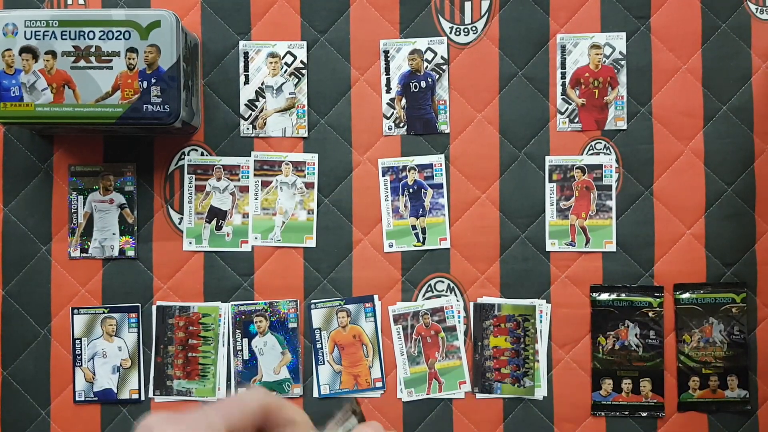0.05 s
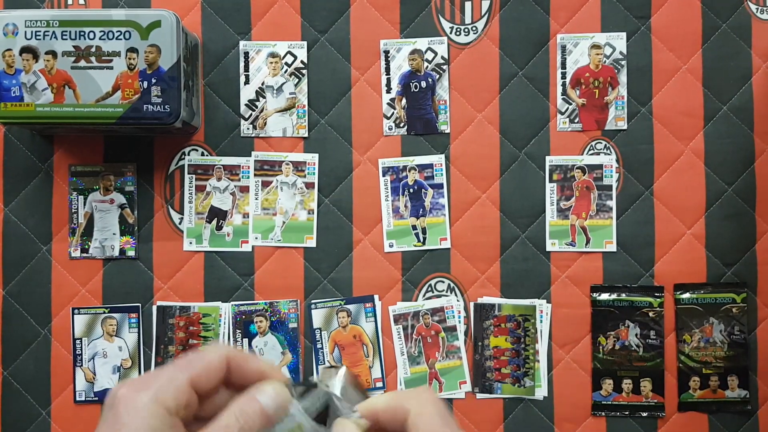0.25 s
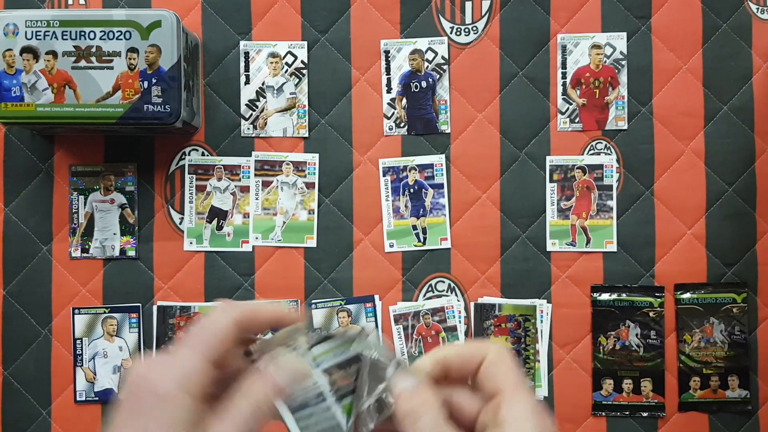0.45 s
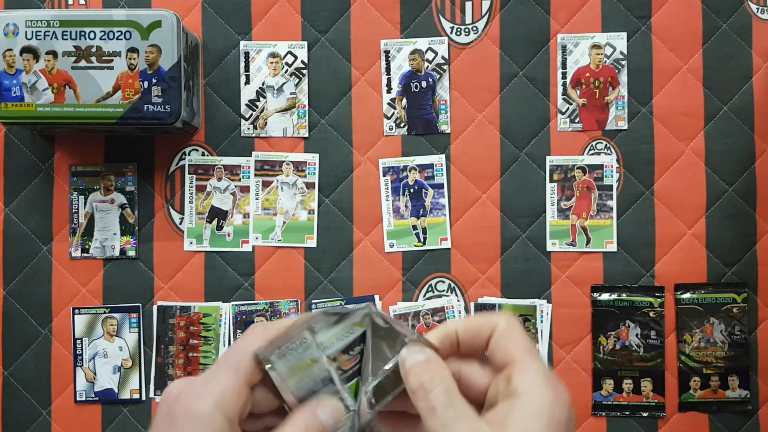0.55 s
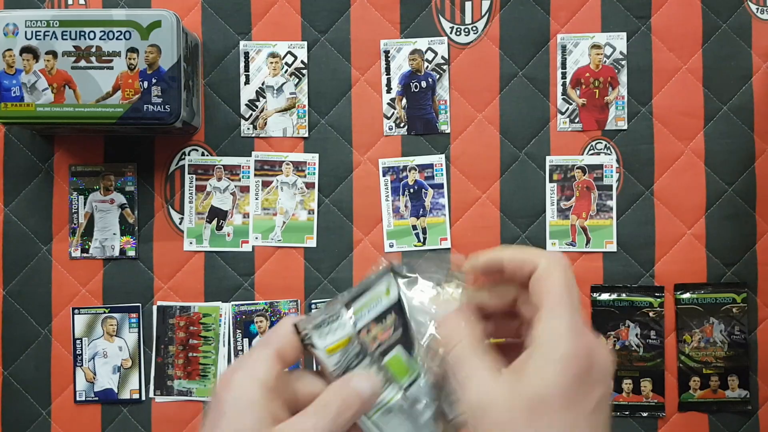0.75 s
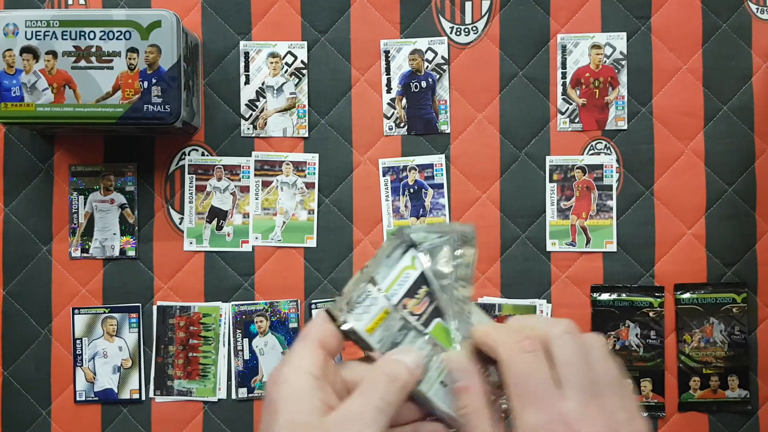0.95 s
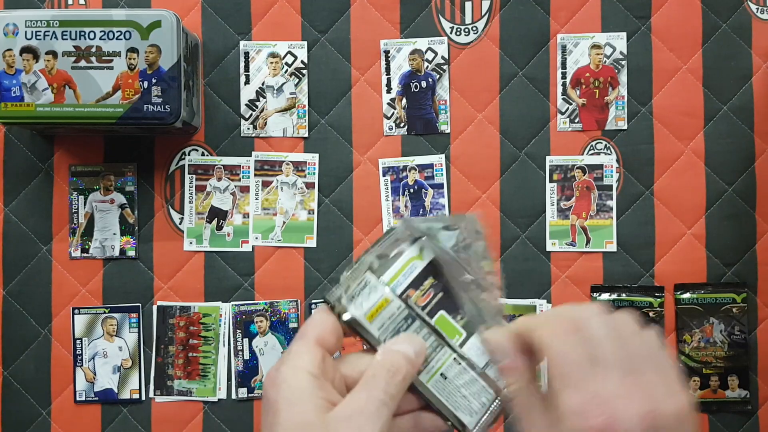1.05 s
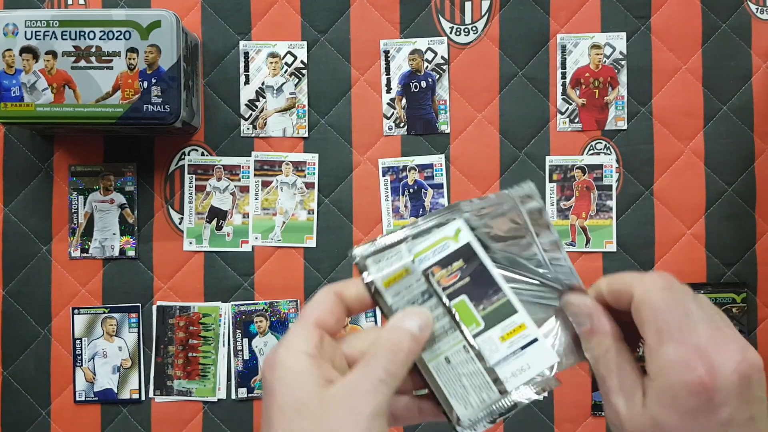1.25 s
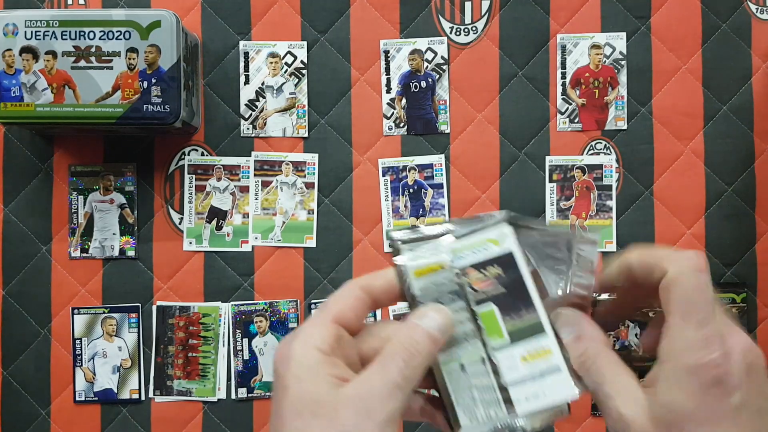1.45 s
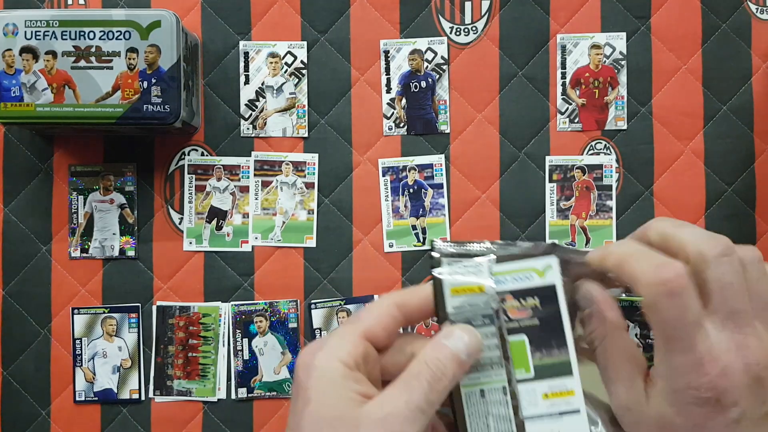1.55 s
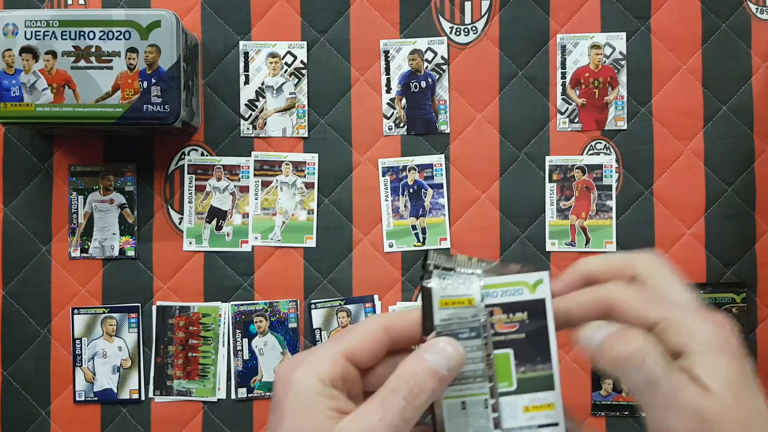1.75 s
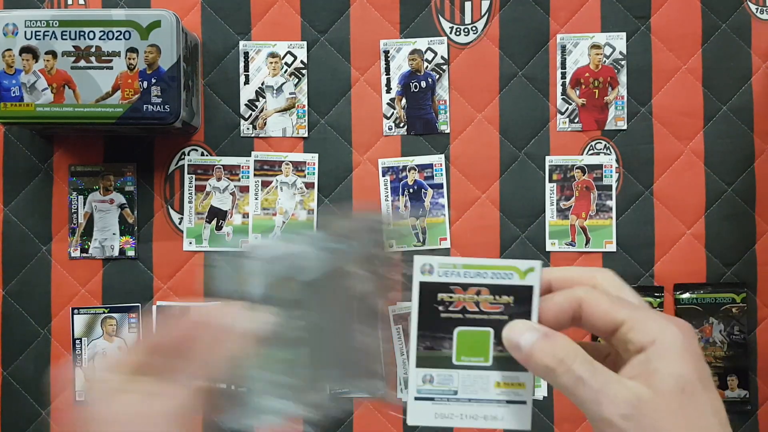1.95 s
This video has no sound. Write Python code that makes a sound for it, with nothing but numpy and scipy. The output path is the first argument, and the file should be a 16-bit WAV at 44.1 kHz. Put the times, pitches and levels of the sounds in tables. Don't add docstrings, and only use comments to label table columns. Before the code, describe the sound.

Close stereo phone pickup of a foil card pouch being torn open: a sudden crackle, scattered ticks and rustles, a stronger burst of papery pops midway, then sparse folding crinkles in a fairly dry, quiet room.

```python
import sys
import numpy as np
from scipy import signal
from scipy.fft import rfft, irfft, next_fast_len
from scipy.io import wavfile
from scipy.ndimage import uniform_filter1d

SR = 44100
rng = np.random.default_rng(int(sys.argv[2]) if len(sys.argv) > 2 else 0)


def gain_from_db(level_db):
    decades = np.asarray(level_db, float) / 20
    return 10 ** decades


def generate_wav(signal):
    frames = np.transpose(np.atleast_2d(signal))
    scaled = np.clip(frames, -1, 1) * 32767
    pcm = np.round(scaled).astype(np.int16)
    wavfile.write(sys.argv[1], SR, pcm)


N = 88200
PANEL_CYCLES, POUCH_CYCLES = 1.65, 1.0


def evened(x):
    return x / np.sqrt(np.mean(x ** 2) + 1e-20)


def read(points, hz):
    f, value = np.transpose(points)
    return np.interp(np.log(hz + 1), np.log(f + 1), value)


def colour(x, points, lag_s=0):
    size = next_fast_len(N + 4096)
    hz = np.fft.rfftfreq(size, 1 / SR)
    delay = np.exp(-2j * np.pi * hz * lag_s)
    return irfft(rfft(x, size) * gain_from_db(read(points, hz)) * delay, size)[..., :N]


def add(mix, s, sound):
    part = mix[..., round(s * SR):][..., :sound.shape[-1]]
    part += sound[..., :part.shape[-1]]


def partly_alike(a, b, same):
    return np.array([a, same * a + np.sqrt(1 - same ** 2) * b])


def pop(hz, cycles):
    u = np.arange(1024) / SR * hz
    shape = (1 - np.exp(-u / 0.18)) * np.exp(-2 * u / cycles) * np.sin(2 * np.pi * u)
    return shape / abs(shape).max()


def apart(shape, luck):
    return np.array([shape, np.roll(shape, int(7 * luck))])


def tick(noise, hz, luck):
    rise_s, spit_s, shiver_s, shiver_db = 0.0003, 0.0004, 0.0028, -20
    longest = 2.7
    t = np.arange(noise.shape[1]) / SR / (1 + (longest - 1) * luck ** 2)
    rise = (1 - np.exp(-t / rise_s)) ** 2
    fall = np.exp(-t / spit_s) + gain_from_db(shiver_db) * np.exp(-t / shiver_s)
    spit = partly_alike(noise[0], noise[1], 0.1) * rise * fall
    spit = signal.sosfilt(signal.butter(2, hz, "high", fs=SR, output="sos"), spit)
    return evened(spit) / 12


# start in seconds, peak level in dB, panel pitch in Hz, tick level in dB.
GRIP_BUCKLES = [(0.0568, -48, 3980, -43), (0.098, -49, 3390, -53), (0.1268, -43.5, 4440, -54.5),
                (0.166, -63, 3100, -44.5), (0.178, -27.5, 2880, -39), (0.1984, -24, 4200, -47),
                (0.2112, -22, 1210, -27), (0.2188, -27, 5170, -25), (0.2267, -15, 4830, -44),
                (0.267, -27, 3400, -38), (0.3772, -30.5, 2580, -40), (0.4025, -35, 1600, -39.5),
                (0.4456, -26.5, 2430, -36.5), (0.4666, -32.5, 1640, -39), (0.4802, -28.5, 2580, -58),
                (0.5239, -26.5, 1510, -47), (0.5687, -26.5, 5650, -54), (0.609, -28.5, 1050, -47.5),
                (0.6354, -31, 1620, -44.5), (0.6844, -32, 1570, -35), (0.7162, -50, 1990, -29.5),
                (0.7428, -60, 1540, -58), (0.763, -24, 5000, -29), (0.7829, -24.5, 1680, -30),
                (0.7982, -46, 2160, -32.5), (0.8704, -30, 1150, -37.5), (0.904, -29, 1920, -39.5),
                (0.9567, -44, 1740, -52), (0.9782, -47, 1530, -51)]
# start in seconds, peak level in dB, panel pitch in Hz, tick level in dB.
RIP_BUCKLES = [(1.0117, -31.5, 2300, -38.5), (1.035, -35, 5800, -39.5), (1.043, -29, 1510, -39),
               (1.1113, -39.5, 1550, -41), (1.1358, -31.5, 3950, -30.5), (1.1665, -22.5, 1580, -39),
               (1.1887, -24.5, 2100, -31), (1.2423, -17.5, 2100, -41), (1.2496, -24, 1610, -31),
               (1.2569, -19.5, 1580, -28.5), (1.262, -16, 1430, -32.5), (1.2747, -14, 1640, -51),
               (1.2845, -35, 4460, -24), (1.289, -13, 1670, -53), (1.3003, -9.5, 1790, -48),
               (1.3007, -17, 2140, -27), (1.3341, -15, 2620, -32), (1.3379, -17, 1220, -47),
               (1.3936, -30, 2080, -47), (1.4122, -24.5, 1540, -34), (1.4356, -30.5, 1960, -41),
               (1.53, -20.5, 2480, -31.5), (1.582, -31, 1840, -39.5), (1.5986, -24, 1860, -39.5),
               (1.7115, -29, 1880, -46.5), (1.7403, -33, 2840, -46), (1.7582, -33, 1990, -43),
               (1.8986, -48, 1690, -79), (1.9769, -30.5, 2730, -38.5), (1.9924, -32.5, 1560, -54)]
# start in seconds, peak level in dB, panel pitch in Hz, tick level in dB.
SMALL_CREASES = [(.0499, -39, 4260, -46.5), (.054, -37.5, 2840, -54), (0.064, -46, 3880, -53),
                 (0.1874, -47, 3830, -48), (0.1933, -36, 6220, -47), (.2332, -33, 4670, -41),
                 (.2985, -35, 6460, -53), (.3286, -34, 5900, -49), (0.392, -37, 6100, -46),
                 (0.484, -41, 6200, -41), (0.497, -34, 7000, -34), (0.502, -34, 6960, -36),
                 (.518, -34.5, 1580, -36), (0.5298, -31, 1560, -41), (.5524, -33.5, 930, -45),
                 (.565, -29.5, 2120, -46), (0.6495, -48, 890, -45), (.757, -33, 6930, -30.5),
                 (.7872, -37, 4670, -28), (0.794, -28, 6050, -36), (0.8114, -30, 910, -37),
                 (.8255, -39, 6720, -43), (.8433, -32.5, 930, -43), (.866, -34, 1840, -45),
                 (0.884, -23, 6760, -39), (0.896, -29, 880, -47), (1.0064, -34.5, 1010, -48),
                 (1.0296, -34, 2300, -47), (1.068, -46, 1180, -40.5), (1.115, -30.5, 1630, -48),
                 (1.1228, -41, 5600, -38.5), (1.129, -28, 5510, -35), (1.174, -27.5, 1120, -36.5),
                 (1.202, -34.5, 1080, -35.5), (1.213, -36, 2290, -40), (1.2929, -19.5, 1480, -34),
                 (1.328, -24, 1580, -39), (1.403, -39, 1510, -49), (1.4252, -27, 2090, -46),
                 (1.4437, -38, 5130, -41), (1.5039, -37.5, 2580, -53), (1.5167, -40, 1820, -54),
                 (1.5394, -25, 2710, -50), (1.5517, -32.5, 2150, -38), (1.6072, -33, 2190, -50),
                 (1.622, -41, 1830, -52), (1.661, -35, 1730, -49), (1.7895, -32.5, 2770, -50.5),
                 (1.807, -38, 2850, -57), (1.906, -41, 1730, -54)]


def snaps():
    panel_trim_db, tick_trim_db = -2, 13.5
    rows = GRIP_BUCKLES + RIP_BUCKLES + SMALL_CREASES
    out = np.zeros((2, N))
    luck = rng.random((len(rows), 4))
    noise = rng.standard_normal((len(rows), 2, 1024))
    for (s, db, hz, tick_db), (side, late, tune, place), hiss in zip(rows, luck, noise):
        add(out, s + 0.0005, gain_from_db(tick_trim_db + tick_db) * tick(hiss, 6200, late))
        level = gain_from_db(db + panel_trim_db)
        panel = apart(pop(hz, PANEL_CYCLES), place)
        add(out, s + 0.000981, np.sign(side - 0.5) * level * panel)
        neighbour = apart(pop(hz * (0.48 + 0.57 * tune), 0.5 * PANEL_CYCLES), place)
        add(out, s + 0.001405 + 0.002004 * late, gain_from_db(-2) * level * neighbour)
    return out


def seal_crack():
    out, hz = np.zeros((2, N)), 10500
    near_db, far_db = -8, -24
    add(out, 0.21185, gain_from_db([[near_db], [far_db]]) * (pop(hz, 5.0) + 0.5 * pop(1.19 * hz, 4.8)))
    return out


# start in seconds, peak level in dB, pitch in Hz, sub-bass level in dB.
AIR_PUSHES = [(0.2089, -40.5, 427, -56.5), (0.372, -48.5, 283, -70), (0.512, -45, 530, -71),
              (0.604, -36.5, 480, -83), (0.684, -37, 353, -60.5), (0.744, -40, 394, -67),
              (0.872, -41, 348, -66), (1.017, -38.5, 306, -94), (1.078, -39, 284, -56.5),
              (1.174, -37, 450, -58), (1.257, -32, 300, -56), (1.333, -25, 425, -53.5),
              (1.411, -28, 375, -69), (1.436, -33, 400, -75), (1.451, -40, 220, -70),
              (1.468, -41.5, 158, -62), (1.528, -30, 404, -56), (1.595, -37, 327, -55),
              (1.736, -44.5, 276, -60), (1.923, -49.5, 325, -67)]


def pushes():
    wobble_trim_db, sub_trim_db, sub_hz = 6, 26.5, 102
    out = np.zeros(N)
    for s, db, hz, sub_db in AIR_PUSHES:
        wobble = gain_from_db(db + wobble_trim_db) * pop(hz, 1.26 * POUCH_CYCLES)
        swing = gain_from_db(sub_db + sub_trim_db) * pop(sub_hz, 0.83)
        add(out, s + 0.003, wobble + swing)
    return out


def tension_db():
    hush_db, hush_s, rattle_db, rattle_s = -4, 0.012, 2, 0.01
    t, hush, rattle = np.arange(N) / SR, np.zeros(N), np.zeros(N)
    for row in GRIP_BUCKLES + RIP_BUCKLES:
        since = t - row[0]
        hush = np.maximum(hush, (since < 0) * np.exp(-abs(since) / hush_s))
        rattle = np.maximum(rattle, (since > 0) * np.exp(-abs(since) / rattle_s))
    return hush_db * hush + rattle_db * rattle


def crease_sizes():
    creases_per_s, spread_db, clump_db, clump_s = 2400, 4.2, 3.5, 0.0048
    clump = evened(uniform_filter1d(rng.standard_normal(N), round(clump_s * SR)))
    luck = np.minimum(rng.exponential(1, N), 2.0)
    size = gain_from_db(spread_db * luck + clump_db * clump + tension_db())
    return size * (rng.random(N) < creases_per_s / SR) * rng.choice([-1., 1.], N)


# time in seconds, effort in dB, pouch squeeze in dB, crispness in dB.
HAND_EFFORT = [(0.151, -84, 16, -10), (0.219, -33.5, -25, 1.5), (0.348, -55, -14.5, 0.5),
               (.44, -53, -5.5, 5.5), (0.502, -41.5, -7.5, 4.5), (0.662, -49, 2.5, -5),
               (0.782, -36.5, -5, -12), (0.989, -80, 12, 0), (1.019, -48, -1.5, -16),
               (1.235, -43.5, -11.5, -1), (1.253, -35.5, 4, -10), (1.336, -42.5, 6.5, 3),
               (1.388, -52, 7, -5), (1.417, -35, 2.5, -25), (1.51, -58, 5.5, -7), (1.537, -37, -3, -12),
               (1.888, -77.5, 4, -11), (2.0, -48.5, -1, -11)]


def crinkle(count=24):
    s, effort_db, pouch_db, crisp_db = np.transpose(HAND_EFFORT)
    size = crease_sizes()
    kind = rng.integers(0, count, N)
    noise, place = rng.standard_normal((count, 2, 1024)), rng.random(count)
    panel_hz = np.geomspace(757, 7900, count)
    pouch_hz = rng.permutation(np.geomspace(141, 586, count))
    layers = np.zeros((7, N))
    for k in range(count):
        pouch = evened(pop(pouch_hz[k], POUCH_CYCLES))
        panel = apart(evened(pop(panel_hz[k], PANEL_CYCLES)), place[k])
        large, small = panel * (2 * k < count), panel * (2 * k >= count)
        spit = tick(noise[k], 4900, place[k - 1])
        shapes = np.array([pouch, *large, *small, *spit])
        layers += signal.oaconvolve((size * (kind == k))[None], shapes, axes=1)[:, :N]
    parts = layers[0], layers[1:3], layers[3:5], layers[5:]
    small_db = effort_db - 4 + 0.2 * crisp_db
    gains = [effort_db + pouch_db, effort_db - 1, small_db, effort_db + crisp_db]
    t = np.arange(N) / SR
    return gain_from_db(-3.5) * sum(evened(x) * gain_from_db(np.interp(t, s, db)) for x, db in zip(parts, gains))


# frequency in Hz, time to fall by 60 dB in seconds.
ROOM_DECAY = [(150, 0.053), (1000, 0.19), (7800, 0.18), (9000, 0.08)]
# frequency in Hz, likeness from 0 to 1.
ROOM_LIKENESS = [(100, 0), (400, 0.84), (900, 0.85), (2000, 0)]


def room(x):
    taps = rng.standard_normal((2, SR // 2)) * (np.arange(SR // 2) > 120)
    hz, t, z = signal.stft(taps, SR, nperseg=256)
    same = np.clip(read(ROOM_LIKENESS, hz), 0, 1)[:, None]
    fall = gain_from_db(-60 * t / read(ROOM_DECAY, hz)[:, None])
    tail = signal.istft(partly_alike(z[0], z[1], same) * fall, SR, nperseg=256)[1]
    return signal.fftconvolve(x, tail / np.linalg.norm(tail[0]), axes=1)[:, :N]


# frequency in Hz, density in dB per Hz.
AIR_COLOUR = [(25, -15), (70, -6.5), (150, -4), (300, -7.5), (620, -11), (1650, -7.5), (4500, -14.5),
              (16000, -25.5)]
# frequency in Hz, likeness from 0 to 1.
AIR_LIKENESS = [(50, 0.71), (300, 0.54), (700, 0.17), (1500, 0.078)]


def air():
    hz = np.fft.rfftfreq(N, 1 / SR)
    a, b = rfft(rng.standard_normal((2, N)))
    same = np.clip(read(AIR_LIKENESS, hz), -1, 1)
    z = partly_alike(a, b, same) * gain_from_db(read(AIR_COLOUR, hz))
    return gain_from_db(-59) * evened(irfft(z, N))


# frequency in Hz, gain in dB.
FOIL_TONE = [(100, -17.5), (350, -3), (650, -1.5), (1500, 2), (3000, 8.5), (8000, 6), (8700, 2.5),
             (14000, 3)]
# frequency in Hz, gain in dB.
FAR_MIC_TONE = [(100, -1.5), (700, 0), (1500, -1.5), (4000, -1), (7600, -3), (8700, -11.5), (16000, -11)]


def scene():
    packet = colour(snaps() + seal_crack() + pushes() + crinkle(), FOIL_TONE)
    quilt = [(700, 4), (3000, -9.0), (9000, -48.0)]
    packet = packet - 0.34 * colour(packet, quilt, 0.001658)
    pair = np.array([packet[0], colour(packet[1], FAR_MIC_TONE, 0.00006)])
    return pair + gain_from_db(-9.5) * room(pair) + air()


def roll_off(x):
    return signal.sosfilt(signal.butter(12, 17000, fs=SR, output="sos"), x)


def record(dry):
    edge = signal.firwin(255, 15800, window=("kaiser", 9), fs=SR)
    x = signal.oaconvolve(dry, edge[None], "same")
    above = dry - x
    power = above ** 2
    sudden = uniform_filter1d(power, 90) > gain_from_db(2 * 8) * uniform_filter1d(power, 2000)
    gate = uniform_filter1d(1. * sudden, 120)
    glint = signal.sosfilt(signal.butter(12, 16900, fs=SR, output="sos"), gate * above)
    return roll_off(x + gain_from_db(-20) * glint - 0.0006)


dry = scene()
out = record(dry)
generate_wav(out)
```